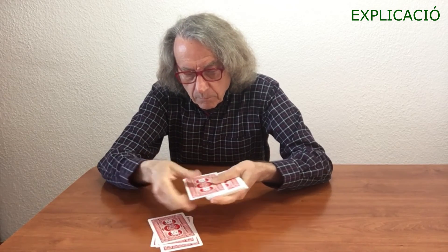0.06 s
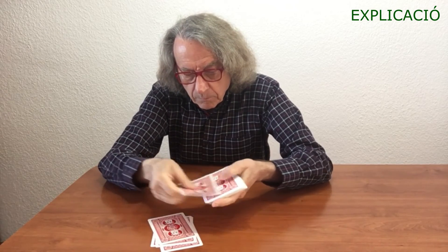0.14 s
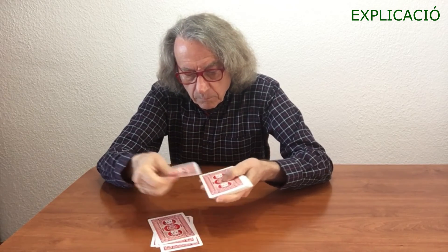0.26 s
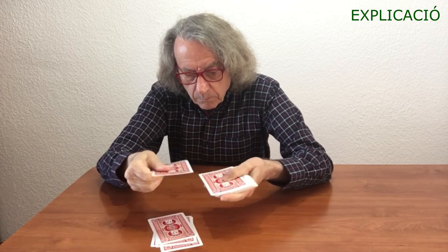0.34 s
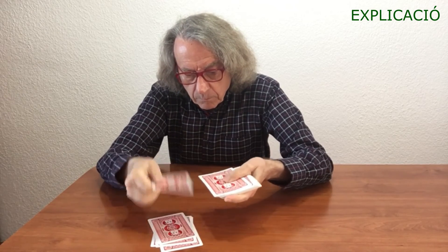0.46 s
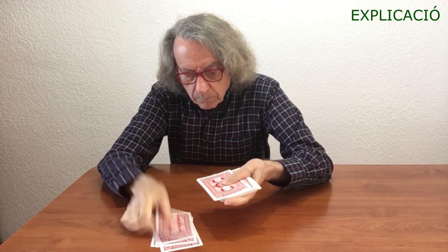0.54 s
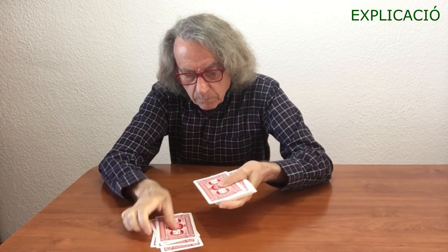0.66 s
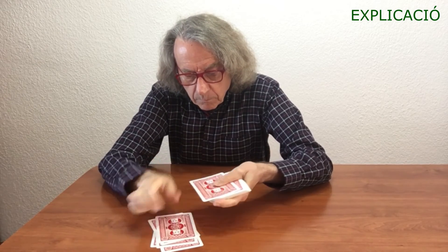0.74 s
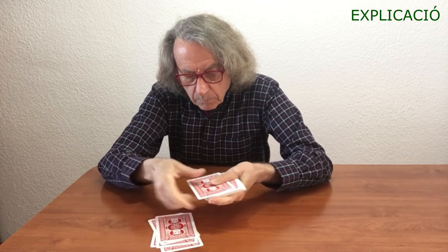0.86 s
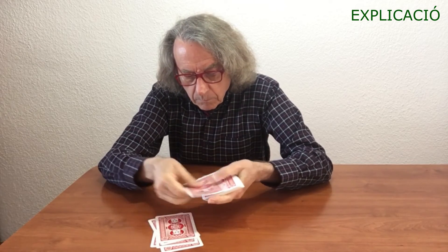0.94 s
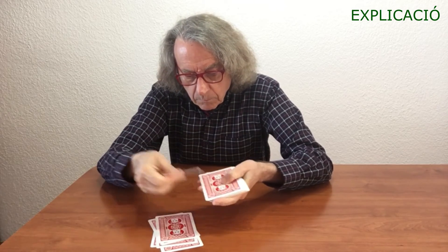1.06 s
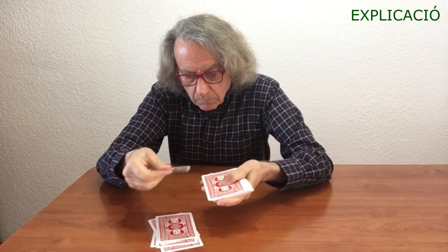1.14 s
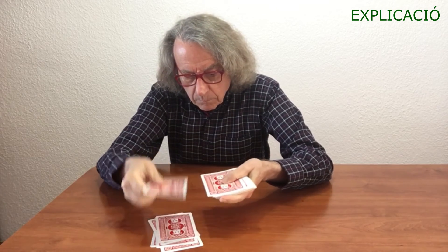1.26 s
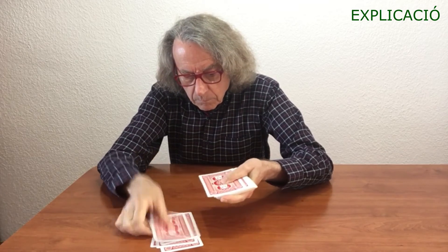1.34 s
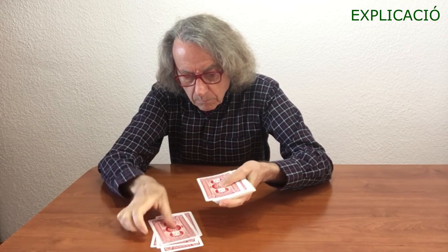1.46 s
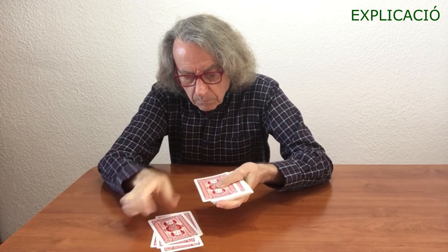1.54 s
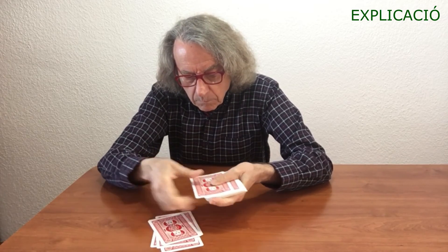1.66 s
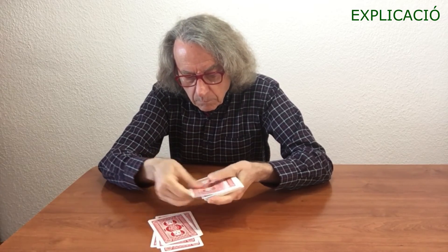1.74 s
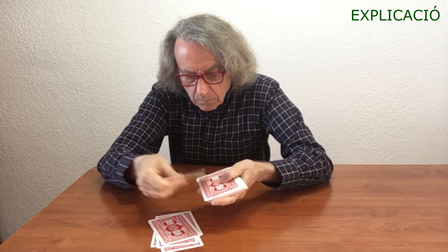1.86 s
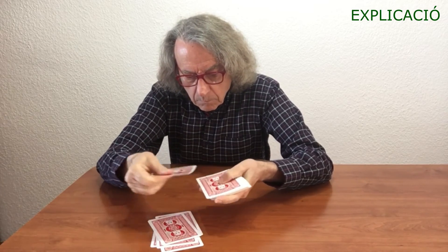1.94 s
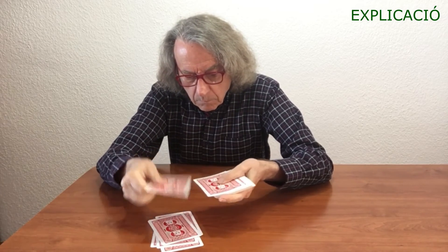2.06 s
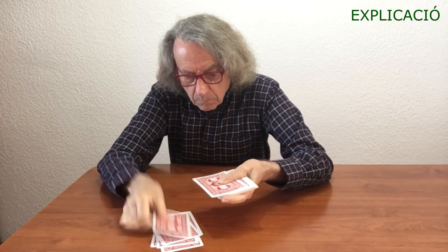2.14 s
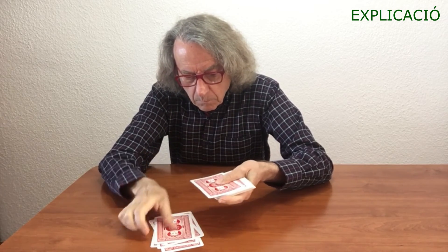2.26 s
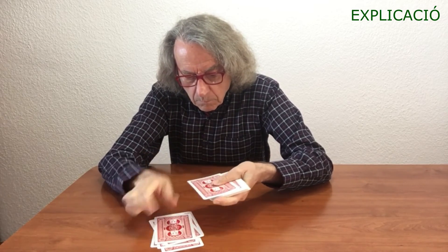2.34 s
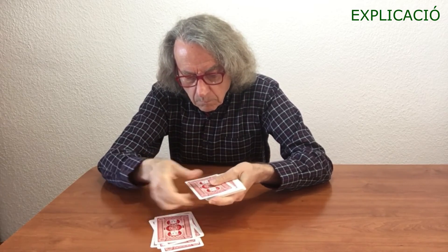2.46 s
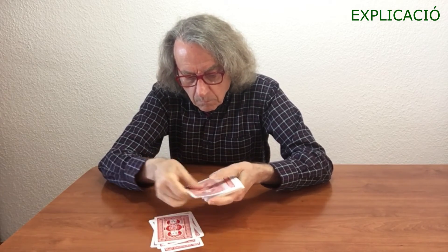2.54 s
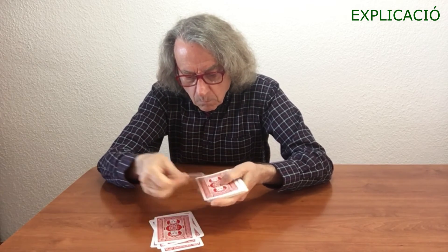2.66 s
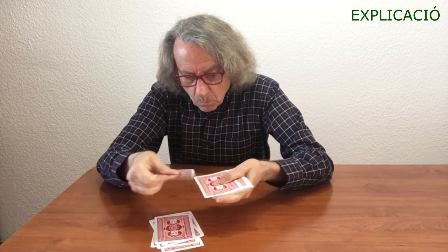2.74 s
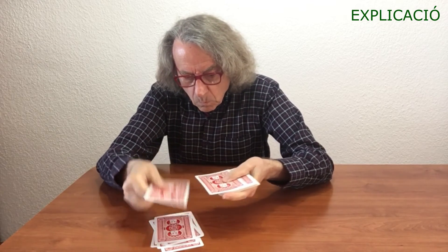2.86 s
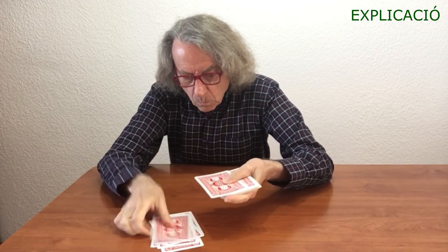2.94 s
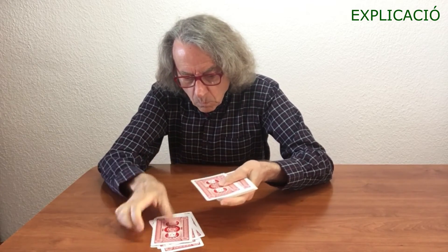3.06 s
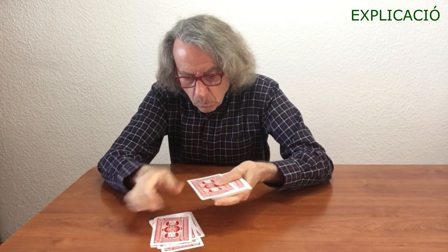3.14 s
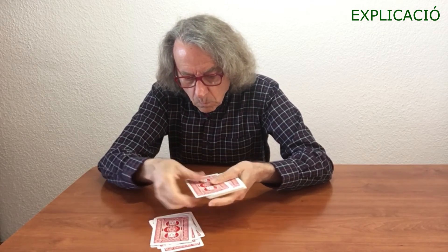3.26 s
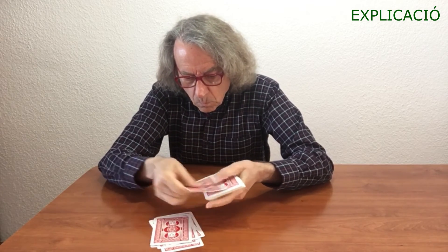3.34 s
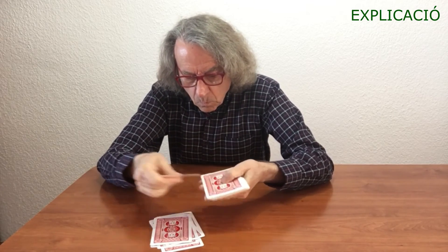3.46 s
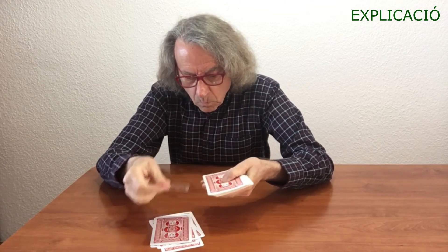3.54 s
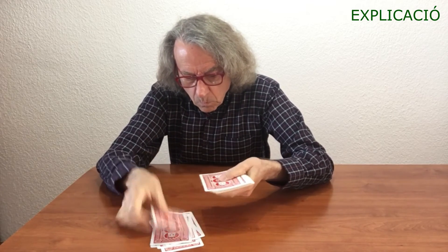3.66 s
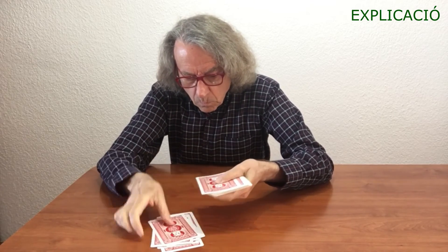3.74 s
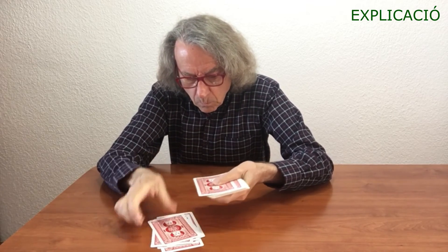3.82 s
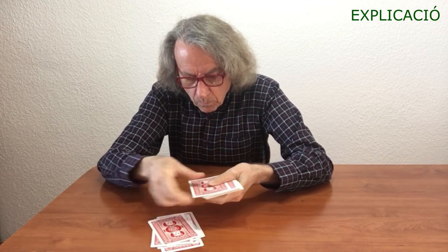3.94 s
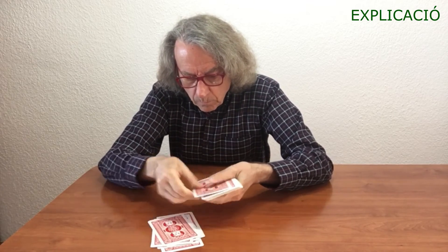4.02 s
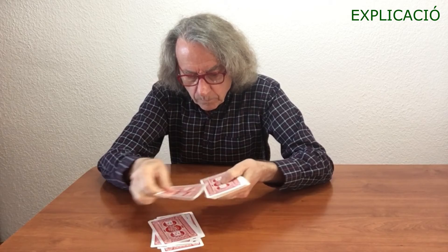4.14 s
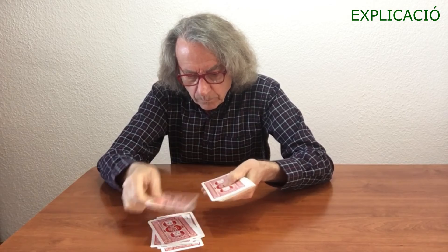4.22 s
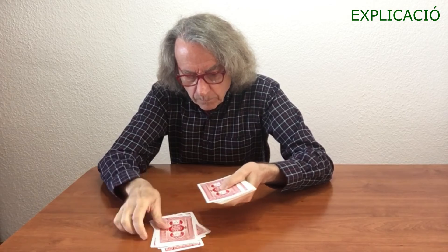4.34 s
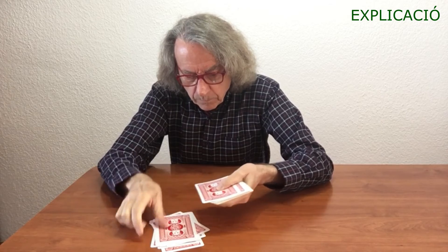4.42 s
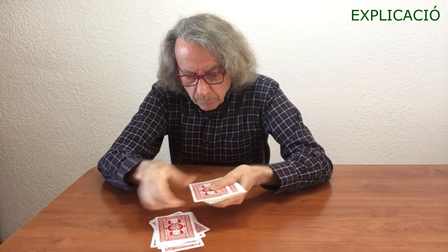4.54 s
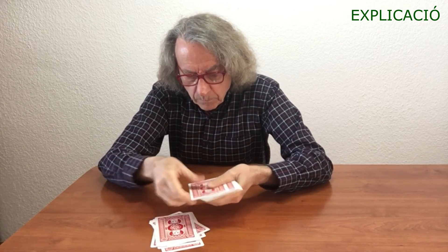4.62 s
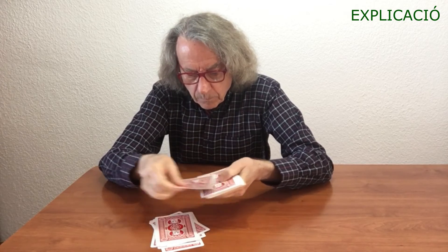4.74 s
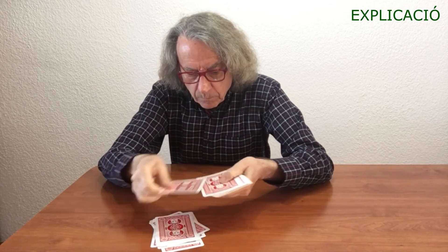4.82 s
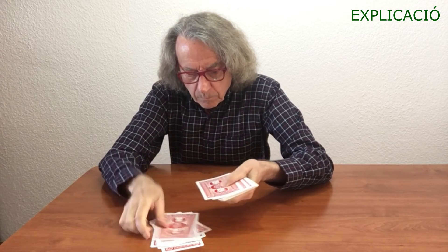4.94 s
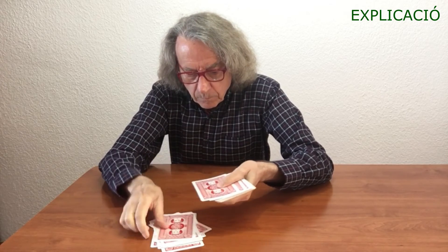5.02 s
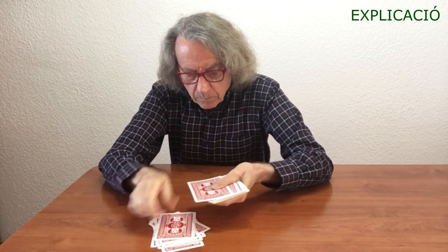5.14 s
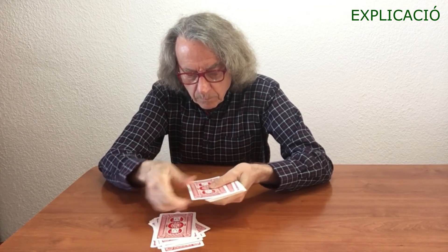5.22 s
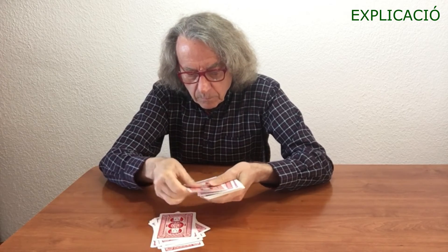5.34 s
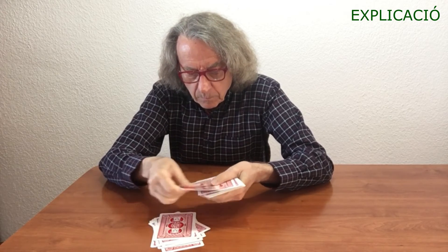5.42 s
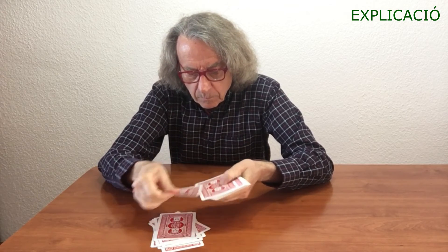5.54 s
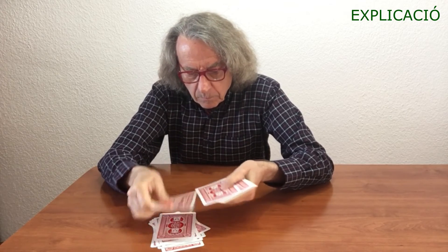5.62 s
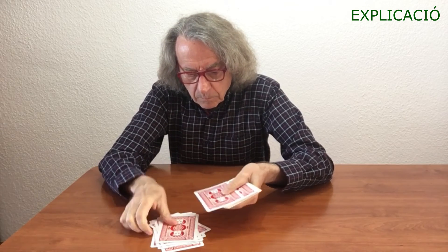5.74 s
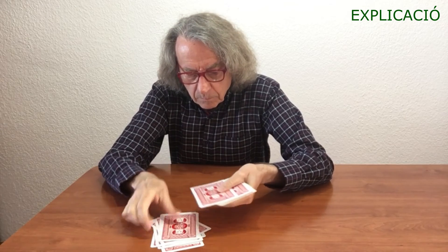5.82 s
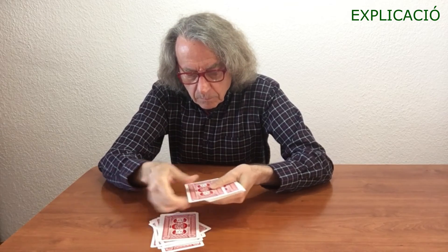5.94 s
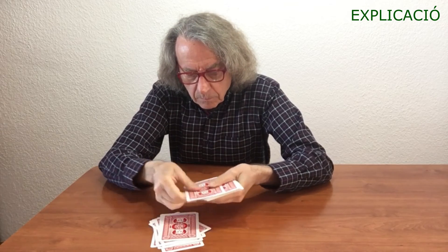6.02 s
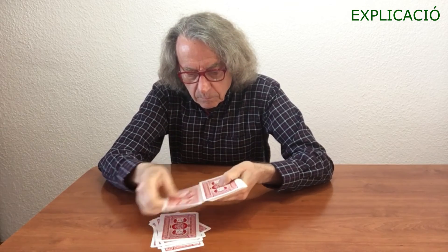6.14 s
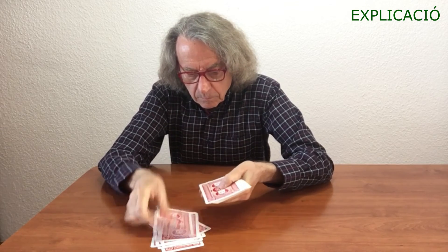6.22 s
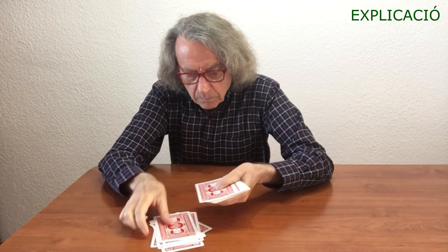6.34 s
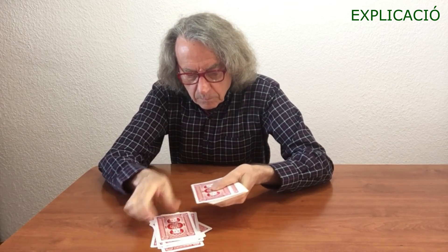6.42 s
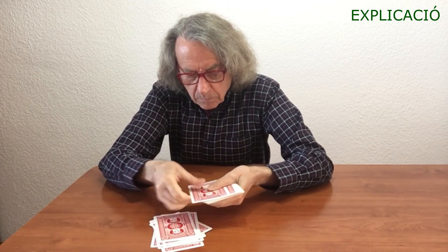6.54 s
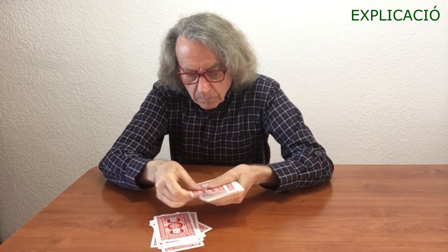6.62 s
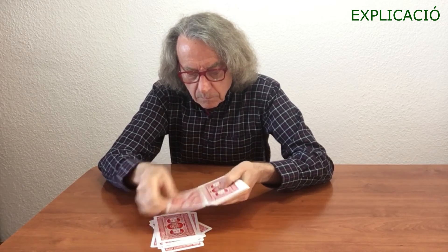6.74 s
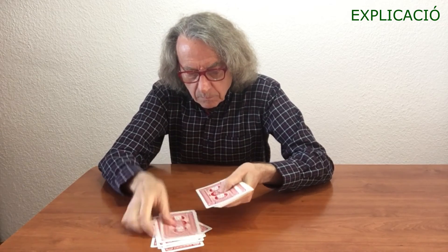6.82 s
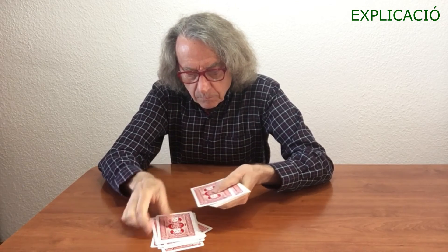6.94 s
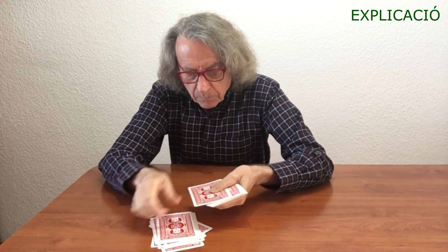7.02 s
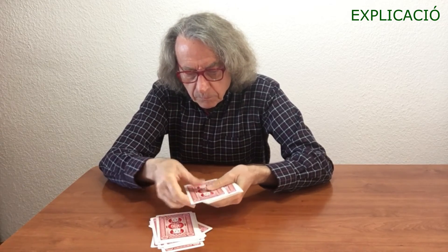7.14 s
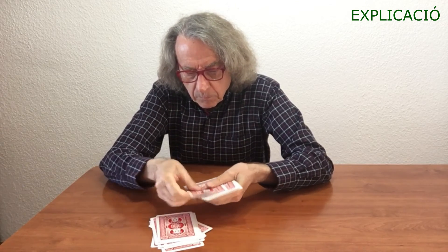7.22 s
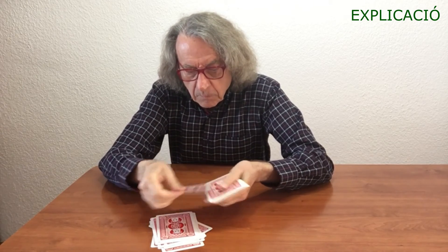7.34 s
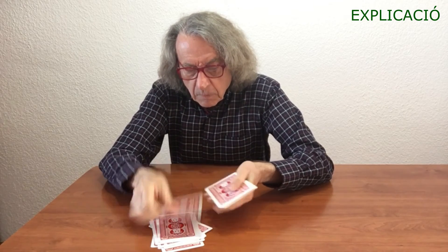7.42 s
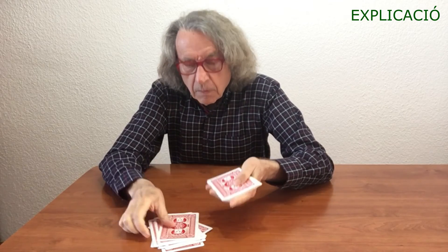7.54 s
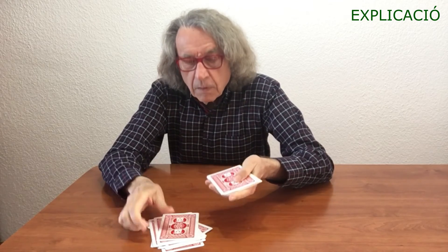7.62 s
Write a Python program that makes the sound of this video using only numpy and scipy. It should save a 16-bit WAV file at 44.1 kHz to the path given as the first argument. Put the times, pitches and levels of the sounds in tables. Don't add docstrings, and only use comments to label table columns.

```python
import sys
import numpy as np
from scipy import signal
from scipy.fft import rfft, irfft
from scipy.io import wavfile

SR = 44100
rng = np.random.default_rng(int(sys.argv[2]) if len(sys.argv) > 2 else 0)


def voltage_ratio(decibels):
    exponent = np.asarray(decibels, float) / 20
    return 10 ** exponent


def transcribe(u):
    v = np.clip(np.atleast_2d(u).T, -1, 1)
    q = np.round(v * 32767).astype(np.int16)
    wavfile.write(sys.argv[1], SR, q)


N = 338763


def rms_one(x):
    return x / np.sqrt(np.mean(x ** 2) + 1e-20)


def at_hz(points, hz):
    point_hz, value = np.transpose(points)[:2]
    return np.interp(np.log(hz), np.log(point_hz), value)


def coloured(spectrum):
    hz = np.maximum(np.fft.rfftfreq(N, 1 / SR), 1)
    lowest_hz = spectrum[0][0]
    inside = (hz > lowest_hz / 2) * np.minimum(1, hz / lowest_hz) ** 4
    white = rfft(rng.standard_normal(N))
    return rms_one(irfft(white * voltage_ratio(at_hz(spectrum, hz)) * inside, N))


def resonance(x, hz, width_hz):
    r = np.exp(-np.pi * width_hz / SR)
    top = [(1 - r * r) / 2, 0, (r * r - 1) / 2]
    return signal.lfilter(top, [1, -2 * r * np.cos(2 * np.pi * hz / SR), r * r], x + 1e-18)


def double_resonance(x, hz, width_hz):
    return resonance(resonance(x, hz, width_hz), hz, width_hz)


def clicks(times, gains):
    out = np.zeros(N)
    np.add.at(out, np.minimum((np.asarray(times) * SR).astype(int), N - 1), gains)
    return out


def dying(x, seconds):
    return signal.lfilter([1], [1, -np.exp(-1 / (seconds * SR))], x + 1e-18)


def burst(start_s, level_db, hz, rise_s):
    t = np.maximum(np.arange(N) / SR - start_s, 0)
    swell = (t / rise_s) * np.exp(np.maximum(1 - t / rise_s, -40))
    return voltage_ratio(level_db) * swell * np.sin(2 * np.pi * hz * t)


def strokes(rows):
    swell_db, fade_db = 42, 33.5
    roundness = 0.19
    out = np.zeros(N)
    for s, level_db, length_s in rows:
        at = np.arange(max(round((s - 0.5) * SR), 0), min(round((s + 0.5) * SR), N))
        u = (at / SR - s) / max(length_s, 0.01)
        slope_db = np.where(u < 0, swell_db, fade_db)
        out[at] += voltage_ratio(level_db - 5.5 - slope_db * (np.hypot(u, roundness) - roundness))
    return out


def ticks(rows, ring_hz):
    out, t = np.zeros(N), np.arange(400) / SR
    for s, peak_db, top_db, mid_db in rows:
        bands = (   # level_db, centre_hz, width_hz, crack_s
            (peak_db - 0.5, ring_hz, 2000, 0.001),
            (top_db + 4.5, 10000, 6000, 0.0008),
            (mid_db - 1.5, 1700, 1600, 0.0012))
        start = round(s * SR)
        for level_db, hz, width_hz, crack_s in bands:
            crack = rng.standard_normal(400) * np.exp(-t / crack_s)
            tick = double_resonance(crack, hz, width_hz)
            out[start:start + 400] += voltage_ratio(level_db) * tick / np.max(np.abs(tick))
    return out


# pitch_hz, density_db (per Hz)
ROOM_TONE_SPECTRUM = [(15, -50), (25, -12), (131, 0.5), (182, -5), (433, -7.5), (496, -16), (600, -12.5),
                      (651, -12), (787, -14), (2330, -23.5), (4860, -24), (7300, -29.5), (12900, -29.5),
                      (15200, -43), (16500, -62)]
# pitch_hz, level_db, width_hz
MOTOR_LINES = [(135.6, -54.5, 5.2), (283.8, -62, 2.2), (370.4, -63, 2.3), (443, -64, 4.1),
               (603, -65.5, 3.8), (700, -72.5, 1.9), (800, -65, 3.7), (1008, -67.5, 3)]


def hum():
    out = voltage_ratio(-49.5) * coloured(ROOM_TONE_SPECTRUM)
    for hz, level_db, width_hz in MOTOR_LINES:
        line = double_resonance(rng.standard_normal(N), hz, width_hz)
        out = out + voltage_ratio(level_db) * rms_one(line)
    return out


# fastest_s, hiss_db, rasp_db, length_s
SHIFTS = [(0.017, -63, -56, 0.088), (0.385, -53, -57, 0.2), (0.526, -48, -56, 0.055),
          (1.217, -52, -55, 0.085), (1.326, -47.5, -54, 0.047), (2.02, -55, -61, 0.19),
          (2.154, -48, -56, 0.036), (2.815, -45.5, -53, 0.11), (2.918, -49, -55, 0.041),
          (3.627, -50.5, -55, 0.091), (4.029, -47.5, -50, 0.068), (4.235, -55, -50, 0.085),
          (4.662, -57, -60, 0.068), (4.921, -43.5, -42.5, 0.081), (5.333, -70, -52, 0.053),
          (5.57, -57, -53, .1), (5.652, -50, -48, 0.066), (6.218, -51, -43, 0.026), (6.582, -51, -49, 0.04),
          (7.235, -52, -52, 0.043), (6.808, -42, -36, 0.021), (7.169, -44, -49, 0.056),
          (7.449, -46, -44, 0.075)]
# fastest_s, hiss_db, rasp_db, length_s
DRAWS = [(0.19, -47.5, -47, 0.16), (1.009, -37.5, -42.5, .12), (1.833, -40.5, -46.5, 0.11),
         (2.632, -39, -46, 0.12), (3.404, -40, -43, .1), (4.131, -37.5, -44.5, 0.1),
         (4.756, -42, -48.5, 0.13), (5.436, -44.5, -51, 0.17), (6.14, -35.5, -41, 0.12),
         (6.746, -39, -47, 0.16), (7.305, -41, -44, 0.12)]
# fastest_s, level_db, length_s
BRUSHES = [(0.058, -52, 0.13), (0.15, -38, 0.06), (0.4, -58, 0.32), (0.955, -47.5, 0.078),
           (1.755, -52, .06), (2.532, -51, .1), (3.37, -47, 0.18), (4.05, -52, 0.067), (4.28, -51, 0.48),
           (4.69, -53.5, 0.094), (4.918, -44, 0.059), (5.27, -49, 0.28), (5.4, -54.5, .2),
           (5.64, -47, 0.12), (6.05, -43.5, 0.046), (6.24, -49.5, 0.19), (6.7, -54, .3), (7.17, -53, 0.33),
           (7.438, -41.5, 0.054)]
# pitch_hz, density_db (per Hz)
HISS_SPECTRUM = [(3820, -48), (6500, -13), (7540, -5.5), (11400, -2), (13200, -7.5), (15900, -19),
                 (16300, -32), (16500, -65)]
# pitch_hz, density_db (per Hz)
RASP_SPECTRUM = [(1060, -24), (1800, -11), (2170, -8), (2970, -6), (3810, -4), (5580, -3), (7000, -13.5),
                 (9100, -50), (15400, -120)]
# pitch_hz, density_db (per Hz)
SLEEVE_SPECTRUM = [(400, -21), (700, 1), (1100, 8.5), (1600, -2), (2600, -19)]


def slides():
    lift_s, lift_db, _ = np.transpose(LIFTS)
    grip = dying(clicks(lift_s, voltage_ratio(lift_db)), 0.0085)
    rubs = DRAWS + SHIFTS
    hiss = strokes([(s, db, length_s) for s, db, _, length_s in rubs]) + voltage_ratio(-20) * grip
    rasp = strokes([(s, db, length_s) for s, _, db, length_s in rubs]) + voltage_ratio(-14.5) * grip
    edge = voltage_ratio(-8.5) * strokes([(s, db, length_s) for s, _, db, length_s in DRAWS])
    singing = rms_one(double_resonance(rng.standard_normal(N), 5370, 1500))
    paper = edge * singing + hiss * coloured(HISS_SPECTRUM) + rasp * coloured(RASP_SPECTRUM)
    sleeve = strokes(BRUSHES) * coloured(SLEEVE_SPECTRUM)
    flutter = voltage_ratio(2.2 * rms_one(dying(rng.standard_normal(N), 0.003)))
    return flutter * (paper + sleeve)


# start_s, peak_db, mid_db
LIFTS = [(0.1254, -23.5, -29.5), (0.938, -29.5, -44), (1.7377, -33.5, -39), (2.5364, -33, -44),
         (3.3057, -33.5, -48), (4.0437, -34, -56), (4.6808, -34.5, -54), (5.3346, -36.5, -41),
         (6.0441, -31.5, -41), (6.6213, -34, -56), (7.166, -41, -53)]


def lifts():
    return ticks([(s, db, db - 8, mid_db) for s, db, mid_db in LIFTS], ring_hz=4700)


# start_s, peak_db
FLICKS = [(0.145, -37), (1.8524, -42), (1.891, -40), (2.6773, -34), (3.337, -32.5), (3.373, -42),
          (4.0176, -44), (4.239, -28.5), (6.697, -36), (7.1477, -38), (7.232, -36)]


def flicks():
    return ticks([(s, db, db - 14, db - 5) for s, db in FLICKS], ring_hz=5000)


# start_s, peak_db, top_db, mid_db
EDGES = [(0.5806, -26, -40, -28.5), (1.3655, -16.5, -27, -30), (2.1695, -19.5, -30, -30),
         (2.9495, -22.5, -27, -30), (3.7015, -21.5, -43, -29), (4.3074, -29, -36, -29),
         (4.9271, -27, -45, -26.5), (5.6628, -28, -40, -17), (6.2482, -24.5, -39, -33),
         (6.8143, -27, -42, -26.5), (7.468, -21, -29, -19)]


def edges():
    return ticks(EDGES, ring_hz=4600)


# start_s, level_db, length_s
SKIDS = [(0.581, -20.5, 0.046), (1.368, -15.5, 0.041), (2.173, -22.5, 0.05), (2.961, -14, 0.056),
         (3.694, -21, 0.041), (4.318, -22, 0.046), (4.946, -17, 0.043), (5.666, -22, 0.061),
         (6.246, -22.5, 0.053), (6.824, -20.5, 0.047), (7.464, -17.5, 0.044)]
# pitch_hz, density_db (per Hz)
SKID_SPECTRUM = [(290, 4), (500, -3.5), (834, -1.5), (1310, -4.5), (1710, -5.5), (4970, -8), (7490, -12),
                 (11300, -7), (14300, -17.5), (15800, -43), (16500, -54)]


def skids():
    t, shape = np.arange(N) / SR, np.zeros(N)
    for s, level_db, length_s in SKIDS:
        part = slice(round(s * SR), round((s + 0.46) * SR))
        u = (t[part] - s) / max(length_s, 0.005)
        shape[part] += voltage_ratio(level_db - 14) * 2 * u * np.exp(1 - 2 * u)
    grain = voltage_ratio(3.5 * rms_one(dying(rng.standard_normal(N), 0.001)))
    return shape * rms_one(grain) * coloured(SKID_SPECTRUM)


# start_s, peak_db, top_db, mid_db
CHATTER = [(0.5907, -38, -49, -28), (2.181, -38, -40, -45), (2.19, -40, -40, -24), (2.227, -41, -25, -45),
           (2.9566, -46, -33, -38), (3.693, -30, -47, -50), (3.734, -28, -34, -49), (4.3244, -43, -42, -37),
           (4.35, -28, -12, -32), (4.9822, -13.5, -36, -39), (5.6903, -42, -42, -31),
           (5.701, -44, -40, -23), (5.7107, -27, -42, -33), (5.724, -28, -32, -43), (5.7312, -24, -33, -44),
           (6.2588, -29, -47, -41), (6.2725, -38, -44, -38), (6.8525, -39, -33, -45),
           (6.859, -17.5, -26, -45), (7.4453, -35, -40, -37), (7.477, -34, -39, -32),
           (7.4868, -23, -25, -25), (7.4965, -25, -34, -38)]


def chatter():
    return ticks(CHATTER, ring_hz=4660)


# start_s, boom_db, thump_db, thump_hz
SLAPS = [(0.605, -29.5, -36.5, 285), (1.397, -34, -33, 214), (2.2, -34.5, -51, 241), (2.973, -34, -45, 260),
         (3.702, -35, -42.5, 290), (4.338, -31.5, -31, 367), (4.982, -32, -31.5, 298),
         (5.695, -42.5, -34, 252), (6.29, -41, -36.5, 302), (6.863, -30.5, -34, 271),
         (7.497, -35, -39, 330)]


def pile_thumps():
    return sum(burst(s, thump_db + 10.5, hz, 0.0025) for s, _, thump_db, hz in SLAPS)


# pitch_hz, level_db, t60_s
ROOM_MODES = [(104.7, -3, 0.1), (121.2, -2.5, 0.76), (136.4, 1, 0.18), (163.6, 1.5, 0.16),
              (188.7, 5, 0.13)]


def room_boom():
    s, boom_db = np.transpose(SLAPS)[:2]
    out = np.zeros(N)
    for hz, mode_db, t60_s in ROOM_MODES:
        chance_db = rng.normal(0, 2.0, len(SLAPS))
        push = clicks(s + 0.005, voltage_ratio(boom_db - 2.0 + mode_db + chance_db))
        r, w = voltage_ratio(-60 / (t60_s * SR)), 2 * np.pi * hz / SR
        ringing = signal.lfilter([0, np.sin(w)], [1, -2 * r * np.cos(w), r * r], push + 1e-18)
        out += resonance(ringing, hz, 50)
    return out


# start_s, peak_db, top_db, mid_db
SNAPS = [(0.6071, -19, -23.5, -24.5), (1.391, -17, -41, -43), (2.2012, -15.5, -34, -33),
         (2.9748, -4.5, -15.5, -16), (3.7197, -40, -35, -26), (4.339, -12, -36, -32),
         (4.9548, -15, -26, -18), (5.682, -19, -30, -30), (6.2922, -17.5, -43, -30),
         (6.8364, -17, -24, -28), (7.4898, -11.5, -19, -22)]


def snaps():
    return ticks(SNAPS, ring_hz=4450)


# start_s, level_db,
# pitch_hz
POPS = [(1.393, -50, 1490), (2.199, -36.5, 1140), (2.974, -54, 920), (3.715, -58, 1500),
        (4.957, -26.5, 1270), (4.96, -29.5, 700), (5.69, -32.5, 554), (7.49, -37, 700), (6.845, -32, 700),
        (5.6885, -20.5, 1356), (6.285, -47, 1300), (6.845, -34, 1170), (7.469, -26, 1234),
        (7.474, -30, 1350), (7.486, -28, 1400), (7.495, -30, 1460), (4.963, -28, 1550), (4.973, -32, 1490),
        (5.698, -25.5, 1520), (5.711, -30.5, 1360)]


def pops_and_knocks():
    return sum(burst(s + 0.00299, level_db + 4.5, hz, 0.0012) for s, level_db, hz in POPS)


# end_s, level_db, length_s
DRAGS = [
    (4.94, -43.5, 0.049),
    (7.45, -54, 0.031),
    (6.226, -53, 0.023),
    (6.829, -47, .035),
]


def drags():
    from_hz, to_hz, width_hz = 3200, 1400, 390
    out = np.zeros(N)
    for end_s, level_db, length_s in DRAGS:
        u = np.arange(round(length_s * SR)) / (length_s * SR)
        rough = rms_one(dying(rng.standard_normal(4000), 1 / (np.pi * width_hz)))[:len(u)]
        pitch_hz = from_hz * (to_hz / from_hz) ** u
        glide = np.sin(2 * np.pi * np.cumsum(pitch_hz) / SR)
        end = round(end_s * SR)
        out[end - len(u):end] += voltage_ratio(level_db + 11) * np.sin(np.pi * u ** 2.2) * rough * glide
    return out


# pitch_hz, t60_s
ROOM_T60 = [(100, 0.81), (500, 0.51), (1500, 0.58), (4000, 0.46), (10000, 0.3), (16000, 0.89)]


def room(x):
    first_echo_s, level_db = 0.0019, -6
    t, tail = np.arange(SR) / SR, np.zeros(SR)
    for low_hz in 60 * 2.0 ** np.arange(8):
        octave = signal.butter(2, [low_hz, 2 * low_hz], "band", fs=SR, output="sos")
        band = signal.sosfilt(octave, rng.standard_normal(SR))
        tail += band * voltage_ratio(-60 * t / at_hz(ROOM_T60, low_hz * np.sqrt(2)))
    tail *= np.clip((t - first_echo_s) / 0.0035, 0, 1)
    return voltage_ratio(level_db) * signal.fftconvolve(x, tail / np.sqrt(np.sum(tail ** 2)))[:N]


def scene():
    in_hand = slides() + lifts() + flicks()
    touching = edges() + skids() + chatter() + drags()
    landing = pile_thumps() + room_boom() + snaps() + pops_and_knocks()
    cards = in_hand + touching + landing
    return (cards + room(cards) + hum())[None]


def band_limit(x):
    return signal.sosfilt(signal.butter(12, 16650, fs=SR, output="sos"), x)


def record(dry):
    thin = signal.sosfilt(signal.butter(2, 50, "high", fs=SR, output="sos"), dry)
    thin = thin + voltage_ratio(-10) * resonance(thin, 4900, 900)
    mix = signal.sosfilt(signal.cheby2(10, 40, 15950, fs=SR, output="sos"), thin)
    return band_limit(mix)


dry = scene()
out = record(dry)
transcribe(out)
```